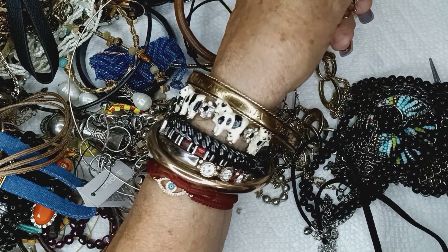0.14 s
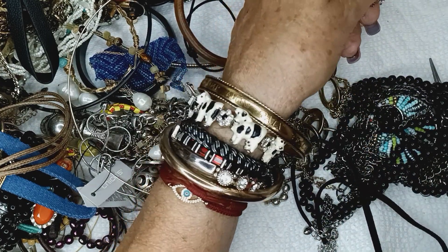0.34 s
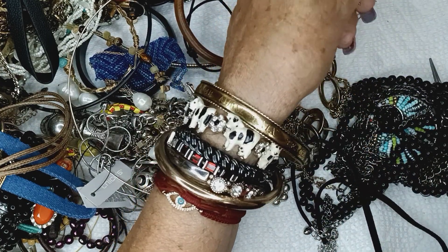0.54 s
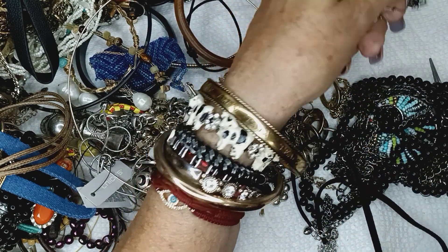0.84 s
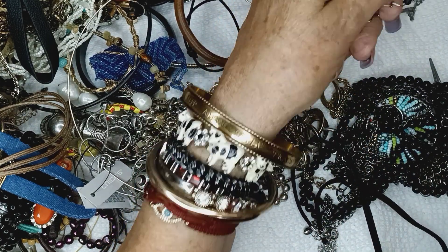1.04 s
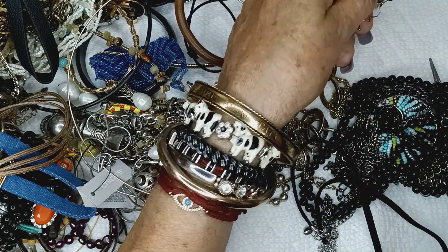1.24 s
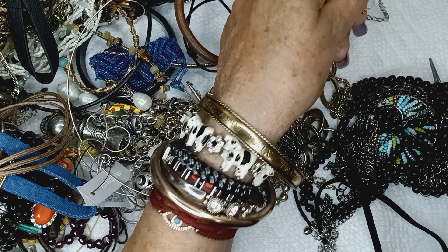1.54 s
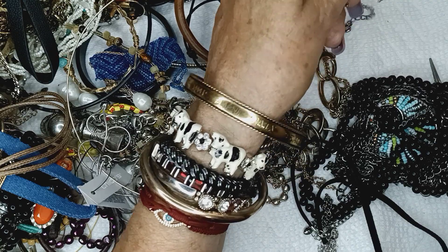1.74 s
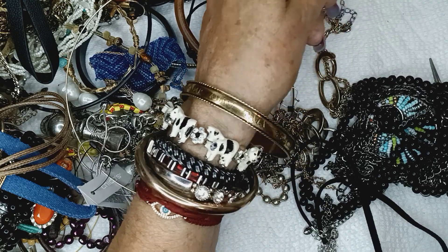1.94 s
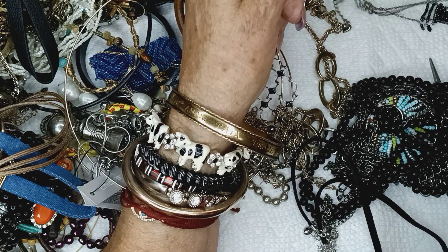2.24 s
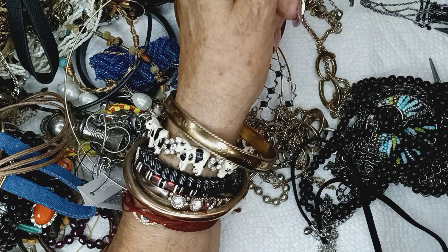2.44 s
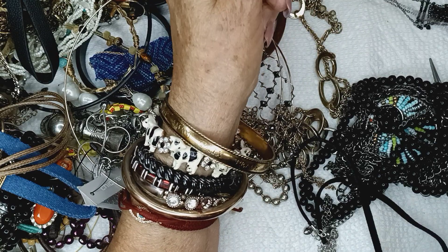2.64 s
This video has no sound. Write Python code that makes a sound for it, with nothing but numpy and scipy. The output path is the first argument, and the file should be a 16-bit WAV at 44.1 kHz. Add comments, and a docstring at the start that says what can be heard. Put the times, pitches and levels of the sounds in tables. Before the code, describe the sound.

Necklace chains clink and slide close by as a hand sorts them, starting with a few faint ticks. From about 0.8 to 2 seconds come busier runs of bright link rattles, with clacking beads, clinking charms and brief bangle rings. A soft bump and a rub on cloth follow at 2.3 seconds, then a low double knock on the table around 2.7 with more clicks. A faint room hum continues underneath.

```python
"""Sorting necklaces on a table

A hand stacked with bangles sorts a heap of necklaces on a cloth-covered table in a quiet room.
Chains slide in runs of tiny link contacts; beads clack, charms clink, a bangle rings briefly.
Near the end a soft bump and a low double knock ring the table top. Faint mains hum underneath."""
import sys
import numpy as np
from scipy import signal
from scipy.fft import rfft, irfft
from scipy.io import wavfile

SR = 44100
rng = np.random.default_rng(int(sys.argv[2]) if len(sys.argv) > 2 else 0)


def unload_audio(sound):
    """Save the sound as a 16-bit wav file, at the path given as the first command line argument."""
    columns = np.transpose(np.atleast_2d(sound))
    # keep every value between -1 and 1, then stretch to whole-number steps
    steps = np.round(np.clip(columns, -1, 1) * 32767)
    wavfile.write(sys.argv[1], SR, steps.astype(np.int16))


N = 123479
T = np.arange(N) / SR

# Table levels are relative, ahead of trims and filters; pan_db is left minus right.
# room noise spectrum: freq_hz, level_db
AIR_SPECTRUM = [(15, -67), (25, -40), (40, -13.5), (97, -4), (130, -3), (185, -5.5), (317, -13), (775, -18),
                (988, -20.5), (1440, -18.5), (4610, -31.5), (8140, -42.5), (9840, -37), (16000, -56)]
# room noise balance: freq_hz, pan_db
AIR_PAN = [(100, 11.5), (1200, 15), (2500, 15.5), (5000, 2), (9000, -1), (15000, -33)]
# mains lines: pitch_hz, level_db
HUM_LINES = [(120.5, -56), (241, -61)]
# blows on the table: start_s, level_db, lowpass_hz
TABLE_KNOCKS = [(.783, -38, 200), (2.297, -43.5, 620), (2.617, -24, 228), (2.6973, -12.5, 895),
                (2.72, -20, 392)]
# table top modes: pitch_hz, level_db, t60_s
TABLETOP_MODES = [(130.7, -6.5, 0.22), (178.7, 1.5, 0.16), (210.6, -3, 0.057), (313, -3.5, 0.09),
                  (388, -9.5, 0.067), (485, -17, 0.17), (528, -19.5, 0.14), (832, -12, 0.11)]
# dense table modes: freq_hz, level_db
THUD_SPECTRUM = [(30, -55.5), (80, -5), (200, 8), (400, 1), (600, -8), (1200, -10.5), (1750, -9),
                 (2200, -21.5), (6000, -41)]
# jewellery balance: freq_hz, pan_db
JEWELLERY_PAN = [(1500, 16), (2800, 12.5), (4500, 4.5), (6500, 9), (8000, 0), (9500, -3.5), (11500, -2),
                 (15000, -3)]
# rub on cloth: freq_hz, level_db
DRAG_SPECTRUM = [(200, -8.5), (400, 4.5), (700, -7.5), (1100, 1.5), (1450, 4), (1800, -4.5), (2500, -4),
                 (3500, -15.5), (8000, -28.5)]
# bead contacts: start_s, level_db
BEAD_CLACKS = [(0.032, -47), (0.062, -52), (.7726, -41), (.7965, -44.5), (.997, -37.5), (1.057, -38.5),
               (1.1112, -39.5), (1.1432, -43), (1.168, -41.5), (1.203, -40.5), (1.254, -44.5),
               (2.4139, -41), (2.7215, -36.5)]
# bead resonances: freq_hz, level_db
BEAD_SPECTRUM = [(900, -10), (2200, -19), (2700, 6), (3500, -6), (4350, -8.5), (5100, -3), (6200, -8),
                 (7200, -12), (11000, -14), (16000, -7.5)]
# bangle strikes: start_s, level_db, tilt_db_per_octave, pan_db
BANGLE_STRIKES = [(0.2298, -53.5, -3.5, 3), (0.73, -56, 4, -3), (1.019, -53, -1.5, -8),
                  (1.0543, -44, 8.5, -6), (1.1674, -38, 12, 1), (1.2013, -42, 16, -4),
                  (1.846, -43.5, 14, -4), (2.4147, -48.5, 8, 3)]
# bangle modes: pitch_hz, level_db, t60_s
HOOP_MODES = [(2655, -2.5, 0.1), (4280, -1.5, 0.057), (6330, -1.5, 0.037), (8580, 5, 0.064),
              (11450, 0, 0.051), (14430, -15, .065)]
# charm and clasp clinks: start_s, t60_s, pan_db, low_hz, low_db, high_hz, high_db
CHARM_CLINKS = [(.7302, 0.03, -4, 7350, -51.5, 9650, -45), (.9209, 0.022, -3, 9400, -38, 12820, -40),
                (1.0538, 0.028, 3, 8090, -33, 12850, -31), (1.1432, 0.008, -3, 4450, -40.5, 9900, -35.5),
                (1.1674, 0.021, -14, 8990, -32, 12950, -37), (1.174, 0.026, -5, 14500, -33, 15500, -38),
                (1.2017, 0.079, 0, 11360, -36, 14430, -48), (1.3035, 0.049, -7, 7220, -49, 11030, -41.5),
                (1.523, .04, -1, 8140, -34, 12850, -40), (1.5813, .016, -3, 8340, -31, 9600, -25),
                (1.5827, 0.021, -2, 5280, -43.5, 12850, -41), (1.607, 0.075, -5, 9600, -55, 11680, -39),
                (1.8395, 0.043, 2, 8080, -29.5, 9900, -30), (1.8449, 0.031, 1, 12800, -34, 14880, -36),
                (1.973, 0.035, 4, 8760, -57, 11200, -55), (2.4147, 0.022, 1, 6010, -37.5, 8900, -43)]
# links shifting in the hand: time_s, level_db
CHAIN_STIR = [(0, -55), (.17, -71), (.45, -68), (.66, -64), (.8, -63), (1.38, -60), (1.7, -67), (2.0, -68),
              (2.15, -68), (2.5, -70.5), (2.8, -61)]
# chains slide and settle: peak_s, level_db, rise_s_per_20db, fall_s_per_20db
CHAIN_SLIDES = [(.265, -50, 0.15, 0.07), (.41, -53.5, 0.057, 0.07), (0.842, -42.5, 0.006, 0.038),
                (0.865, -43.5, 0.061, 0.025), (0.985, -37.5, .008, 0.035), (0.956, -46, 0.087, 0.016),
                (1.0, -35, 0.032, 0.11), (1.168, -32, 0.02, 0.035), (1.245, -44, 0.082, 0.06),
                (1.46, -47.5, 0.029, 0.078), (1.51, -34, 0.011, 0.02), (1.523, -35.5, 0.027, 0.051),
                (1.611, -45.5, 0.091, 0.047), (1.85, -38.5, 0.03, 0.072), (2.292, -52, 0.065, 0.12),
                (2.627, -49, 0.047, 0.025), (2.723, -48, 0.083, 0.041)]
# single link contacts: start_s, level_db
LINK_TICKS = [(0.257, -33.5), (0.3487, -33.5), (0.396, -41.5), (.539, -41.5), (0.7305, -43), (0.797, -39.5),
              (0.836, -35), (0.8624, -35), (0.875, -28), (.9209, -31), (0.9824, -39), (0.9968, -22.5),
              (1.001, -25.5), (1.008, -29), (1.053, -22.5), (1.1116, -38), (1.1432, -35), (1.161, -23),
              (1.1671, -23), (1.174, -30), (1.2015, -26), (1.2238, -30), (1.2333, -33), (1.2596, -32),
              (1.3045, -40), (1.3532, -37), (1.4576, -44), (1.478, -34), (1.498, -32.5), (1.508, -32),
              (1.523, -42), (1.5811, -31), (1.607, -29), (1.712, -39.5), (1.826, -27), (1.8394, -20.5),
              (1.86, -30.5), (1.883, -35), (1.9106, -33), (1.9242, -35), (1.948, -45), (1.974, -47),
              (1.996, -45.5), (2.3283, -34.5), (2.4146, -29), (2.608, -30.5), (2.6392, -27.5),
              (2.722, -33.5), (2.7692, -40)]
# link contact spectrum: freq_hz, level_db
LINK_SPECTRUM = [(500, -23), (1400, -19), (2800, -18), (4400, -18.5), (7000, -10), (8200, -8.5), (9700, 3),
                 (11000, -4.5), (12800, -9), (13800, -12.5), (15700, -14)]

LINK_T60_S = 0.0027
CONTACT_APART, THUD_APART = 0.3, 0.57  # share of power that differs between channels
LN_1000 = np.log(1000)


def from_db(db):
    """Decibels to gain."""
    return 10 ** (np.asarray(db) / 20)


def unit_rms(x):
    """Scale to rms 1."""
    return x / np.sqrt(np.mean(x ** 2) + 1e-20)


def at_hz(points, hz):
    """Interpolate on a log-frequency axis."""
    freqs_hz, values = np.transpose(points)
    return np.interp(np.log(np.maximum(hz, 1)), np.log(freqs_hz), values)


def pan(db):
    """Left and right gains, unit mean power."""
    gains = from_db(np.array([np.atleast_1d(db), -np.atleast_1d(db)]) / 2)
    return gains / np.sqrt(np.mean(gains ** 2, axis=0))


def add(out, start_s, x):
    """Mix x into out."""
    i = int(start_s * SR)
    out[..., i:i + x.shape[-1]] += x[..., :max(N - i, 0)]


def butter(x, order, hz, kind="low"):
    """Butterworth filter."""
    return signal.sosfilt(signal.butter(order, hz, kind, fs=SR, output="sos"), x)


def colour(x, spectrum, balance=None, size=8192):
    """Minimum-phase filter, unit power gain, optional left-right balance."""
    hz = np.arange(size // 2 + 1) * SR / size
    sides = pan(at_hz(balance, hz)) if balance else np.ones((1, 1))
    gain = unit_rms(from_db(at_hz(spectrum, hz)) * sides)
    causal_fold = np.r_[1, np.full(size // 2 - 1, 2), 1, np.zeros(size // 2 - 1)]
    cepstrum = irfft(np.log(gain)) * causal_fold
    impulse = irfft(np.exp(rfft(cepstrum)))
    return signal.fftconvolve(np.atleast_2d(x), impulse, axes=1)[:, :N]


def drift(rate_hz):
    """Random wander between unit-variance knots."""
    knots = rng.standard_normal(int(N / SR * rate_hz) + 2)
    return np.interp(T * rate_hz, np.arange(len(knots)), knots)


def stereo_noise(size, apart=CONTACT_APART):
    """Two partly correlated channels of unit noise."""
    noise = rng.standard_normal((3, size))
    return np.sqrt(1 - apart) * noise[0] + np.sqrt(apart) * noise[1:]


def decay(t, t60_s):
    """Exponential fall, 60 dB in t60_s."""
    return np.exp(-LN_1000 * t / t60_s)


def swell_db(peak_s, rise_s, fall_s):
    """Peak of 0 dB; rise and fall times per 20 dB."""
    return -20 * np.maximum((peak_s - T) / rise_s, (T - peak_s) / fall_s)


def resonate(x, hz, t60_s):
    """One mode: a unit click rings a decaying sine of height 1."""
    radius, angle = decay(1 / SR, t60_s), 2 * np.pi * hz / SR
    return signal.lfilter([0, np.sin(angle)], [1, -2 * radius * np.cos(angle), radius ** 2], x + 1e-18)


def crack(t60_s):
    """One hard contact: a decaying noise burst of set energy."""
    envelope = decay(T[:SR // 20], t60_s)
    burst = envelope * stereo_noise(len(envelope))
    return burst * np.linalg.norm(envelope) / np.linalg.norm(burst, axis=1, keepdims=True)


def chain_motion():
    """Liveliness of the chains as a gain: stir and slides summed in power."""
    power = from_db(np.interp(T, *np.transpose(CHAIN_STIR))) ** 2
    for peak_s, db, rise_s, fall_s in CHAIN_SLIDES:
        power += from_db(db + swell_db(peak_s, rise_s, fall_s)) ** 2
    return np.sqrt(power)


def room_air(trim_db=-59):
    """Steady low room noise, mostly left."""
    noise = rng.standard_normal((2, N)) + 0.66 * rng.standard_normal(N)
    return from_db(trim_db) * colour(noise, AIR_SPECTRUM, AIR_PAN)


def mains_hum(waver_db=3.6, waver_rad=0.094):
    """Two mains lines, wavering in level and phase."""
    out = np.zeros(N)
    for hz, db in HUM_LINES:
        amplitude = np.sqrt(2) * from_db(db + waver_db * drift(rate_hz=10.32))
        out += amplitude * np.sin(2 * np.pi * hz * T + waver_rad * drift(rate_hz=7.5))
    return out


def reflections(x, scatter_db=-2.5, scatter_t60_s=0.024, room_db=-9, room_t60_s=0.093):
    """Direct sound, quick scatter off table and heap, faint room tail."""
    out, t = x.copy(), T[:SR // 2]
    for db, t60_s in ((scatter_db, scatter_t60_s), (room_db, room_t60_s)):
        tail = rng.standard_normal((2, len(t))) * decay(t, t60_s) * (t > .001)
        tail /= np.linalg.norm(tail, axis=1, keepdims=True)
        out += from_db(db) * signal.fftconvolve(x, tail, axes=1)[:, :N]
    return out


def table_top(thud_db=-7, thud_t60_s=0.2, rumble_db=-25.5, low_cut_hz=124.4):
    """Blows ring and thud the top, which radiates little deep bass; sliding chains make it murmur."""
    knocks, t = np.zeros((2, N)), T[:SR // 2]
    ring = sum(from_db(db) * np.sin(2 * np.pi * hz * t) * decay(t, t60_s)
               for hz, db, t60_s in TABLETOP_MODES)
    for start_s, db, lowpass_hz in TABLE_KNOCKS:
        dense_modes = colour(stereo_noise(SR, THUD_APART), THUD_SPECTRUM)[:, len(t):2 * len(t)]
        thud = from_db(thud_db) * dense_modes * decay(t, thud_t60_s)
        add(knocks, start_s, from_db(db) * butter(ring + thud, 2, lowpass_hz))
    rumble = from_db(rumble_db) * chain_motion() * colour(stereo_noise(N, THUD_APART), THUD_SPECTRUM)
    return butter(knocks, 5, low_cut_hz, "high") + rumble


def cloth_drag(peak_db=-55.5, flutter_db=1.8):
    """Soft, uneven rub of a necklace drawn over the cloth."""
    db = peak_db + swell_db(peak_s=2.293, rise_s=0.081, fall_s=0.39) + flutter_db * drift(rate_hz=70)
    return from_db(db) * colour(rng.standard_normal(N), DRAG_SPECTRUM, JEWELLERY_PAN)


def beads(trim_db=-6, t60_s=0.04):
    """Beads knock together: broad, short resonances, lower and hollower than the links."""
    out = np.zeros((2, N))
    for start_s, db in BEAD_CLACKS:
        add(out, start_s, from_db(db + trim_db) * crack(t60_s))
    return colour(out, BEAD_SPECTRUM, JEWELLERY_PAN)


def bangle(rub_db=-22, spread_db=0.5):
    """A metal hoop, struck or rubbed by chains; harder strikes favour its upper modes."""
    out, t = np.zeros((2, N)), T[:SR // 4]
    modes_hz, modes_db, t60s_s = np.transpose(HOOP_MODES)
    octaves = np.log2(modes_hz) - np.log2(modes_hz).mean()
    for start_s, db, tilt_db_per_octave, pan_db in BANGLE_STRIKES:
        jitter_db = spread_db * rng.standard_normal(len(modes_hz))
        gains = from_db(db + modes_db + tilt_db_per_octave * octaves + jitter_db)
        sides = pan(at_hz(JEWELLERY_PAN, modes_hz) + pan_db)
        cycles = np.outer(modes_hz, t) + rng.random((2, len(modes_hz), 1))
        modes = np.sin(2 * np.pi * cycles) * decay(t, t60s_s[:, None])
        add(out, start_s, np.sum((gains * sides)[:, :, None] * modes, axis=1))
    rub = from_db(rub_db) * chain_motion() * stereo_noise(N)
    for hz, db, t60_s in HOOP_MODES:
        ring = resonate(rub, hz, t60_s) / np.sqrt(t60_s * SR / LN_1000)
        out += from_db(db) * pan(at_hz(JEWELLERY_PAN, hz)) * ring
    return out


def charms(trim_db=-1.5, detune_cycles_per_t60=1.5, count=5):
    """Two clusters of close modes per charm: a clear ping if free, a broad clash if damped."""
    out, t = np.zeros((2, N)), T[:SR // 5]
    weights = signal.windows.hann(count + 2)[1:-1, None] ** 2
    for start_s, t60_s, pan_db, low_hz, low_db, high_hz, high_db in CHARM_CLINKS:
        envelope = decay(t, t60_s)
        for hz, db in ((low_hz, low_db), (high_hz, high_db)):
            offsets = np.linspace(-1, 1, count) + rng.uniform(-.2, .2, count)
            cluster_hz = hz + detune_cycles_per_t60 / t60_s * offsets[:, None]
            phase_cycles = rng.random((2, 1, 1)) + .5 * rng.random((2, count, 1))  # roughly in step
            modes = np.sin(2 * np.pi * (cluster_hz * t + phase_cycles))
            ring = np.sum(weights * modes, axis=1) * envelope
            ring *= np.linalg.norm(envelope) / np.linalg.norm(ring, axis=1, keepdims=True)
            add(out, start_s, from_db(db + trim_db) * pan(at_hz(JEWELLERY_PAN, hz) + pan_db) * ring)
    return out


def link_jingle(count=64, hits_per_s=5000, t60_s=0.028, pan_spread_db=12):
    """Loose links ring briefly, each at its own pitch and place; unit rms."""
    pitches_hz = np.linspace(2400, 15600, count) + rng.uniform(-90, 90, count)
    sides = pan(rng.normal(0, pan_spread_db, count))
    hits = rng.standard_normal(N) * (rng.random(N) < hits_per_s / SR)
    struck_link = rng.integers(0, count, N)
    return unit_rms(sum(sides[:, [k]] * resonate(hits * (struck_link == k), hz, t60_s)
                        for k, hz in enumerate(pitches_hz)))


def link_rattle(hits_per_s=1800, spread_db=6.5):
    """Tiny link contacts at random, each a short crack; unit rms."""
    sizes = from_db(spread_db * np.minimum(rng.exponential(1, N), 4))
    energy = sizes ** 2 * (rng.random(N) < hits_per_s / SR)
    retention = decay(1 / SR, LINK_T60_S) ** 2
    power = signal.lfilter([1], [1, -retention], energy + 1e-18)
    return unit_rms(np.sqrt(power) * stereo_noise(N))


def chains(rattle_db=-2.5, jingle_db=-12.5, sparkle_db=4, sparkle_hz=12000, tick_trim_db=1):
    """Sliding links, louder and brighter when lively, with single dry ticks on top."""
    motion = chain_motion()
    out = motion * (from_db(rattle_db) * link_rattle() + from_db(jingle_db) * link_jingle())
    sparkle = butter(motion * stereo_noise(N), 4, sparkle_hz, "high")
    out += from_db(sparkle_db) * motion / motion.max() * sparkle
    for start_s, db in LINK_TICKS:
        add(out, start_s, from_db(db + tick_trim_db) * crack(LINK_T60_S))
    return colour(out, LINK_SPECTRUM, JEWELLERY_PAN)


def scene(bass_right_db=-14.5, left_lag_s=0.00065):
    """Jewellery plus left-heavy table and hum, all slightly late on the left, over room noise."""
    jewellery = reflections(chains() + beads() + bangle() + charms() + cloth_drag())
    bass = (table_top() + mains_hum()) * from_db([[0], [bass_right_db]])
    near = jewellery + bass
    near[0] = np.interp(T - left_lag_s, T, near[0])
    return near + room_air()


def record(dry):
    """Steep low-pass on the top treble."""
    cutoff_hz = 15900
    return signal.sosfilt(signal.ellip(10, .2, 70, cutoff_hz, fs=SR, output="sos"), dry)


dry = scene()
out = record(dry)
unload_audio(out)
```